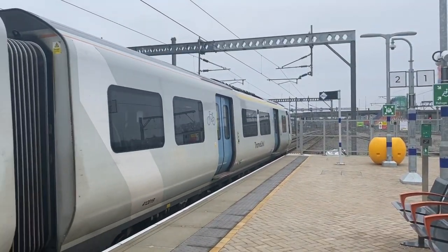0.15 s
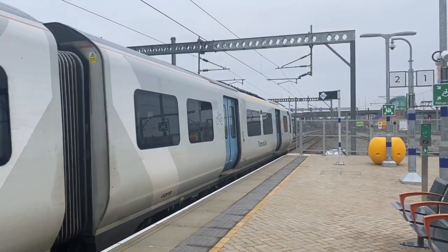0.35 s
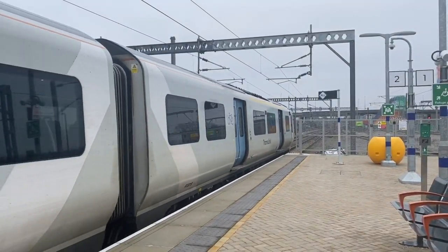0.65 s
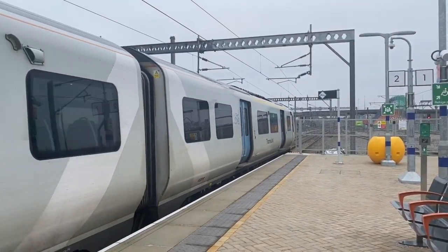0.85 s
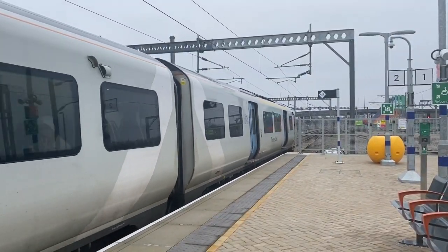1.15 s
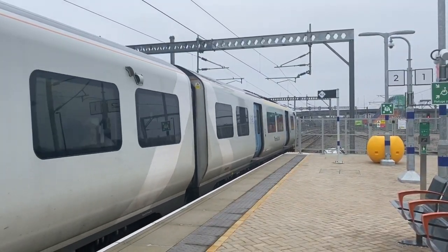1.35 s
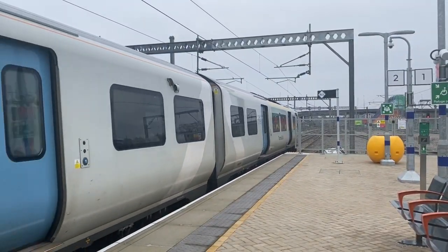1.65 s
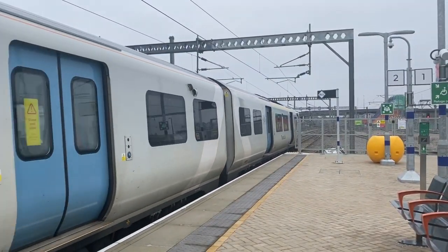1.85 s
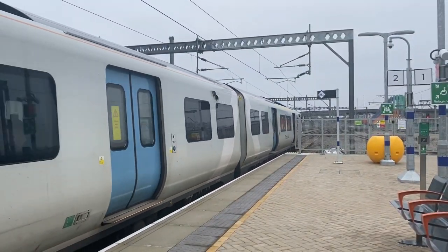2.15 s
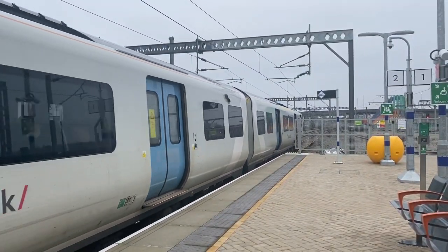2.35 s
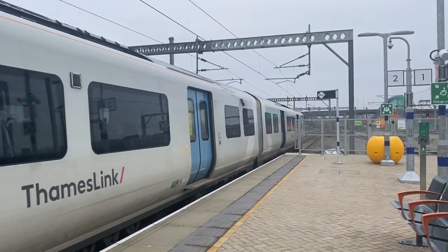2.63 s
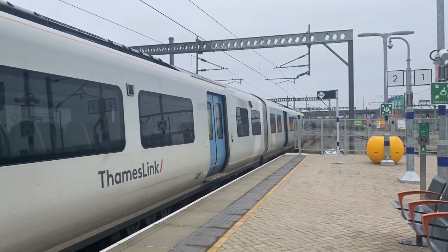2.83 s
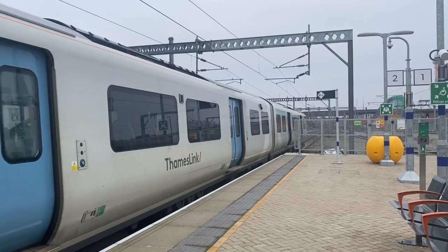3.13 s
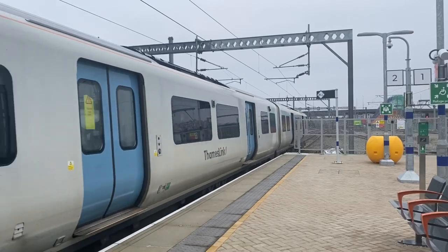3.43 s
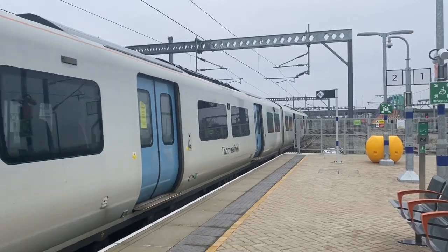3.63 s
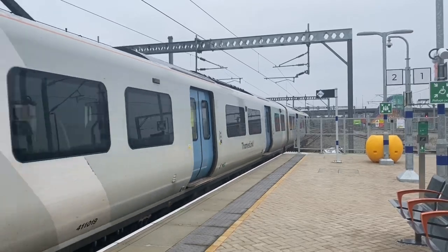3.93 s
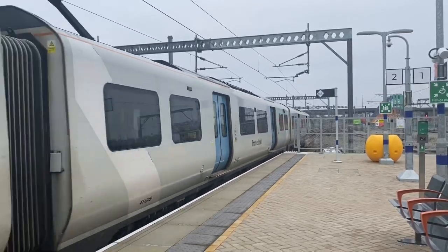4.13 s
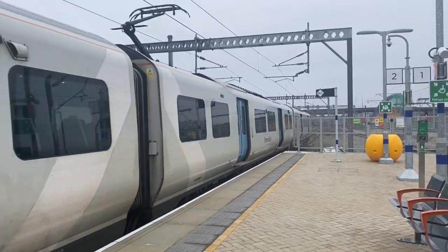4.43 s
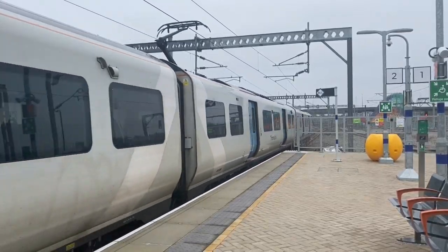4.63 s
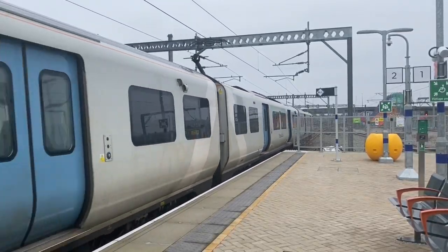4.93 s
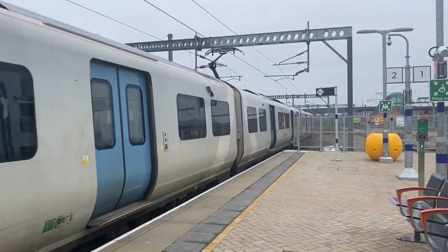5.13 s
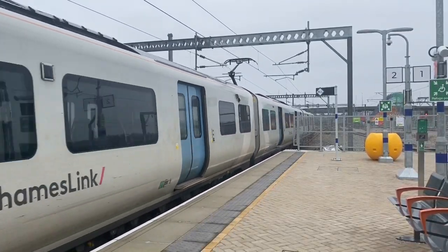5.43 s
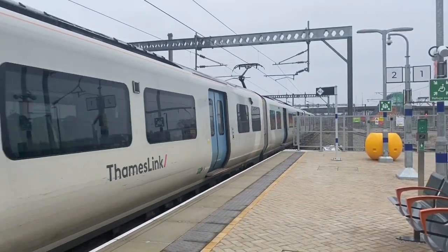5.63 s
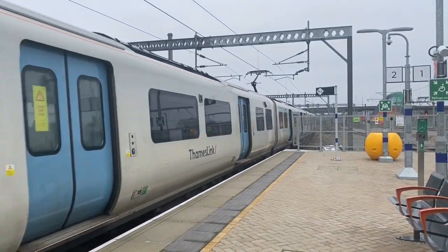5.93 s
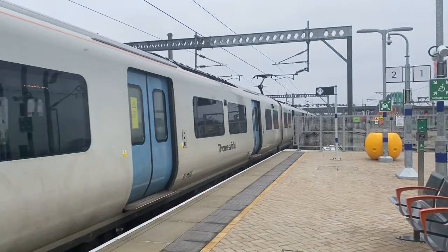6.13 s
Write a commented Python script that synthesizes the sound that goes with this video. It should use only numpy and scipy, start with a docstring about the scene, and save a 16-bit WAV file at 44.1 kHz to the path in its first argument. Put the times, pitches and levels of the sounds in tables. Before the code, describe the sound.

Close electric train pulling away: rising motor hum, ringing inverter whine, fizzing converter buzz, and wheels rumbling and hissing louder as carriages pass.

```python
"""Electric train pulling away

An electric train gathers speed along an open platform, within a few metres of a pair of microphones.
Traction inverters sing on multiples of their switching rate and sag in pitch as they pass; an auxiliary
converter fizzes by between them. Motors and gears whine upward over the rumble and hiss of the wheels.
Tones are lines of wandering strength and phase, the rest is coloured noise; nearness shapes most levels."""
import sys
import numpy as np
from scipy import signal
from scipy.fft import rfft, irfft, next_fast_len
from scipy.io import wavfile
from scipy.ndimage import uniform_filter1d

SR = 44100
rng = np.random.default_rng(int(sys.argv[2]) if len(sys.argv) > 2 else 0)


def output_pcm(signal):
    """Save a mono or channel-first signal as 16-bit PCM at the path in sys.argv[1].

    Samples are clipped to [-1, 1] before scaling.
    """
    pcm = np.clip(np.atleast_2d(signal).T, -1, 1) * 32767
    wavfile.write(sys.argv[1], SR, np.round(pcm).astype(np.int16))


N = 276947
TIME = np.arange(N) / SR
SIZE = next_fast_len(N)
BINS = np.fft.rfftfreq(SIZE, 1 / SR)

# motor speed as the pitch of its hum: t/s, fundamental f/Hz
MOTOR_SPEED = [(0, 50), (1.8, 75.8), (3, 97.2), (4, 114.6), (5, 132), (5.6, 143), (6.28, 153.5)]
# traction inverters riding past: abreast t/s, distance/m, level/dB, extra level of buzz and sizzle/dB
INVERTER_UNITS = [(-.05, 2.6, 2, -3), (4.24, 2, 1.5, .5), (5.8, 3, -24, 21)]
# level of the inverters' clean tone: t/s, level/dB
TONE_LEVEL = [(0, -47), (.23, -53.5), (.42, -45), (.52, -54.5), (.62, -48), (1.2, -55.5), (1.5, -49.5),
              (1.75, -54), (2.25, -49), (2.45, -48), (2.95, -48.5), (3.3, -47.5), (3.55, -53.5),
              (3.78, -43), (3.95, -52), (4.22, -47), (4.37, -42), (4.54, -44), (4.63, -38.5), (4.77, -51),
              (4.9, -45), (5, -34.5), (5.14, -57), (5.32, -38.5), (5.46, -37), (5.55, -50), (5.63, -38),
              (5.69, -51), (5.8, -41.5), (5.95, -46), (6.28, -48)]
# bogies riding past: abreast t/s, distance/m, level/dB
BOGIE_PASSES = [(.1, 4.3, -3), (3.45, 0.6, -28.5), (4.4, 3.86, -1), (6.15, 2.9, -1.5)]

SWITCH_HZ = 676  # switching rate of the traction inverters
METRES_PER_CYCLE = .054  # train travel per cycle of the hum
REFERENCE_HZ = 100  # hum pitch at which growth with speed is 0 dB
MOTOR_TURNS = np.cumsum(np.interp(TIME, *np.transpose(MOTOR_SPEED))) / SR  # cycles of the hum so far


def gain_of(db):
    """Decibels to amplitude."""
    return np.exp(np.asarray(db) * (np.log(10) / 20))


def evened(x):
    """Scales to rms 1."""
    return x / np.sqrt(np.mean(abs(x) ** 2) + 1e-20)


def curves(rows):
    """Each column of a time table, sample by sample."""
    s, *columns = np.transpose(rows)
    return [np.interp(TIME, s, column) for column in columns]


def spectra(rows):
    """Each column of a frequency table, bin by bin along a log frequency axis."""
    hz, *columns = np.transpose(rows)
    return [np.interp(np.log(BINS + 1), np.log(hz), column) for column in columns]


def noise(spectrum):
    """Steady noise of the given colour, rms 1."""
    white = rfft(rng.standard_normal(SIZE))
    return evened(irfft(white * gain_of(spectra(spectrum)[0]), SIZE)[:N])


def line(turns, width_hz, steady=0.):
    """A tone whose strength and phase wander, which spreads it over a band; steady is its unwavering part."""
    count = next_fast_len(N // 16)  # the wander is slow, so a coarse grid will do
    hz = np.fft.fftfreq(count, N / SR / count)
    bell = 2 ** -np.minimum(2 * (hz / width_hz) ** 2, 20)  # half power across the full width
    draws = rng.standard_normal(count) + 1j * rng.standard_normal(count)
    wander = evened(np.fft.ifft(bell * draws))
    wander = evened(wander + steady * np.exp(2j * np.pi * rng.random()))
    wander = np.interp(TIME, np.linspace(0, TIME[-1], count), np.sqrt(2) * wander).astype(np.complex64)
    angle = 2 * np.pi * (turns - np.floor(turns)).astype(np.float32)
    return wander.real * np.cos(angle) - wander.imag * np.sin(angle)


def wobble(rate_hz):
    """Slow random motion up to about the given rate, rms 1."""
    count = N // 100
    hz = np.fft.rfftfreq(count, N / SR / count)
    slow = irfft(rfft(rng.standard_normal(count)) * np.exp(-(hz / rate_hz) ** 2), count)
    return np.interp(TIME, np.linspace(0, TIME[-1], count), evened(slow))


def octaves():
    """Motor speed in octaves above the reference."""
    return np.log2(curves(MOTOR_SPEED)[0] / REFERENCE_HZ)


def pass_by(abreast_s, distance):
    """Emission time (which gives the Doppler glide) and nearness of a point riding on the train."""
    travel = METRES_PER_CYCLE * MOTOR_TURNS
    # a quadratic through the travel also places points that are abreast before the start
    journey = np.polyfit(TIME[::SR // 10], travel[::SR // 10], 2)
    path = np.hypot(travel - np.polyval(journey, abreast_s), distance)
    delay = path / 343  # speed of sound in m/s
    return TIME - delay, distance / path


def passing(points, beam=1.):
    """Joint gain of points (abreast t/s, distance/m, level/dB) riding past; a higher beam is more directional."""
    return np.sqrt(sum((gain_of(db) * pass_by(s, distance)[1] ** beam) ** 2 for s, distance, db in points))


def units():
    """For each inverter, its share of their joint sound and the switching cycles heard from it so far."""
    rides = [pass_by(s, distance) for s, distance, _, _ in INVERTER_UNITS]
    weights = [gain_of(row[2]) * near for row, (_, near) in zip(INVERTER_UNITS, rides)]
    total = np.sqrt(sum(weight ** 2 for weight in weights))
    return [(weight / total, SWITCH_HZ * emitted) for weight, (emitted, _) in zip(weights, rides)]


def body_lift(multiple):
    """Decibels that car body and gear case add, over time, to this multiple of the motor speed."""
    # resonances: centre f/Hz, width/Hz, lift/dB
    resonances = [(98, 15, 3.5), (134.8, 5.8, 8.5), (150.6, 2.1, 16), (179, 42.4, 9.5), (220.7, 7.9, 8),
                  (250.4, 19.6, 8.5), (265.5, 10, 5.5), (296.8, 9.6, 8), (352, 9, 8), (439.5, 26, 11),
                  (522, 15, 4), (602, 24, 5.5), (760, 51, 2), (836, 67, 4.5), (910, 230, 5.5),
                  (1050, 34, 2), (1220, 16, 5)]
    s = TIME[::SR // 200]
    hz = multiple * np.interp(s, *np.transpose(MOTOR_SPEED))
    lift = sum(db / (1 + (2 * (hz - centre) / width) ** 2) for centre, width, db in resonances)
    return np.interp(TIME, s, lift)


def fans():
    """Cooling air rushes steadily under the cars, whatever the speed."""
    # colour of the air rush: f/Hz, relative level per Hz/dB
    air_colour = [(600, 8), (1000, -36), (1350, 27.5), (1700, -18), (3000, -5.5)]
    return gain_of(-57.5) * noise(air_colour)


def tone_echo():
    """The inverters' clean tone thrown back from along the platform, its pitches smeared together."""
    level_db = uniform_filter1d(curves(TONE_LEVEL)[0], size=SR // 2)  # half a second of smoothing
    return gain_of(level_db - 6.5) * line(2 * SWITCH_HZ * TIME, width_hz=56)


def rolling():
    """Wheel and rail roughness shakes track and car body, rings the rails and hisses.

    The deep bass and the boom follow their own levels; the others grow with speed and as bogies pass."""
    # levels of deep bass and body boom, each before its trim: t/s, level/dB
    deep_level = [(0, -34.5), (0.8, -40), (1.8, -41.5), (2.1, -34.5), (3.3, -33.5), (4.3, -38),
                  (6.28, -30.5)]
    boom_level = [(0, -34), (0.3, -32.5), (1.3, -38), (1.9, -32.5), (2.6, -35.5), (3.15, -32.5),
                  (3.45, -27.5), (3.7, -38.5), (3.95, -27.5), (4.3, -36.5), (4.65, -30.5), (5, -27.5),
                  (5.3, -18), (5.9, -29.5), (6.28, -24.5)]
    # noise colours: f/Hz, relative level per Hz/dB
    deep_colour = [(15, -42), (30, -21), (50, -2.0), (70, 4.5), (120, 0.5), (300, -70.0)]
    rumble_colour = [(15, -42), (30, -7), (48, -0.5), (70, 2), (110, -3), (165, 6), (220, -11), (500, -85)]
    boom_colour = [(100, -55), (170, -9.5), (205, 1), (240, 2.5), (262, 4), (285, 1), (310, -2.5),
                   (360, -26), (700, -73)]
    roar_colour = [(150, -25), (330, 2), (430, 3.5), (560, -0.5), (850, -3.5), (1200, -10.5), (1600, -13),
                   (2500, -17), (6000, -60)]
    ring_colour = [(1000, -48), (1600, -6.5), (1820, 2), (1980, 9), (2140, 10.5), (2350, -2), (2560, 12.5),
                   (2850, 9.5), (3150, 0), (3600, -6.5), (4500, -88)]
    hiss_colour = [(2000, -41), (3300, 16), (3650, 8), (4200, 9), (4800, 4.5), (5500, 10.5), (6400, 2.5),
                   (7600, -1), (8500, -16.5), (9400, -2), (10800, -3.5), (12000, -36), (13500, -14),
                   (15000, -18)]
    speed, bogies = octaves(), passing(BOGIE_PASSES, beam=1.29)

    def level(far_db, near_db, db_per_octave):
        """The whole train plus the bogie alongside, both growing with speed."""
        return gain_of(db_per_octave * speed) * np.hypot(gain_of(far_db), gain_of(near_db) * bogies)

    deep = gain_of(curves(deep_level)[0] - 2.5) * noise(deep_colour)
    boom = gain_of(curves(boom_level)[0] - 3.5) * noise(boom_colour)
    rumble = level(far_db=-39.5, near_db=-39, db_per_octave=5.5) * noise(rumble_colour)
    roar = level(far_db=-42.0, near_db=-41.5, db_per_octave=5.5) * noise(roar_colour)
    ring = level(far_db=-48.0, near_db=-40.0, db_per_octave=11.0) * noise(ring_colour)
    hiss = level(far_db=-57.0, near_db=-44.0, db_per_octave=7.5) * noise(hiss_colour)
    return deep + boom + rumble + roar + ring + hiss


def squeals():
    """A wheel rubs the rail and sings in short swells near one resonance."""
    # swells: peak t/s, f/Hz, half length/s, level/dB
    swells = [(4.302, 2125, 0.04, -35.5), (5.815, 2126, 0.15, -40), (6.02, 2185, 0.11, -41)]
    out = 0
    for s, hz, half, db in swells:
        swell = np.exp(-((TIME - s) / half) ** 2)
        out = out + gain_of(db) * swell * line(hz * TIME, width_hz=93, steady=0.28)
    return out


def drive():
    """Hum and gear whine swell as each multiple climbs through a resonance, and as bogies and gearbox pass."""
    # motor hum and gear whine: multiple of the hum fundamental, level/dB
    hum_orders = [(1, -43.5), (2, -46.5), (3, -48), (3.5, -57), (4, -51.5), (5, -54)]
    gear_orders = [(6, -10), (7, -8.5), (8, -5), (9, -11), (10, -15), (11, -15)]
    # a second, lower drone that also climbs with speed: multiple of its own fundamental, level/dB
    drone_orders = [(1, -48), (2, -48.5), (3, -50)]
    # gearbox riding past: abreast t/s, distance/m, level/dB
    gearbox = (4.42, 4.3, -46)
    drone_ratio = .8  # drone fundamental over hum fundamental
    hum_db_per_octave, gear_db_per_octave = 7, -0.5  # change with speed
    speed = octaves()

    orders = list(hum_orders) + [(k * drone_ratio, db) for k, db in drone_orders]
    hum = sum(gain_of(db + body_lift(k)) * line(k * MOTOR_TURNS, width_hz=15, steady=1.5) for k, db in orders)

    meshing = MOTOR_TURNS + 0.014 * wobble(rate_hz=7.0)  # backlash: gears run a little ahead and behind
    gears = 0
    for k, db in gear_orders:
        flutter_db = 2 * wobble(rate_hz=6)
        gears = gears + gain_of(db + body_lift(k) + flutter_db) * line(k * meshing, width_hz=30, steady=.3)

    # the motors ride on the bogies
    motors = gain_of(hum_db_per_octave * speed) * passing(BOGIE_PASSES, beam=0.67) * hum
    return motors + gain_of(gear_db_per_octave * speed) * passing([gearbox], beam=0.61) * gears


def converter():
    """Combs of sidebands round a 3 kHz carrier and its multiples, beamed from two vents under the floor."""
    # path that sets the Doppler glide: abreast t/s, distance/m
    ride = (2.2, 3.2)
    # vents riding past: abreast t/s, distance/m, level/dB
    vents = [(1.88, 1.23, -46), (2.62, 2.22, -45.5)]
    # lower and upper comb: f/Hz, level relative to the vents/dB
    low_comb = [(2890, -11.5), (2990, -3.5), (3090, -6), (3190, -3.5), (3290, -10), (3390, -14)]
    high_comb = [(5690, -19), (5790, -9.5), (5890, -18), (5990, -9.5), (6090, -8.5), (6190, -10.5),
                 (6290, -18), (6480, -16), (8900, -21.5), (9050, -23)]
    emitted, _ = pass_by(*ride)
    out = 0
    for comb, beam in ((low_comb, 0.93), (high_comb, 1.28)):  # the upper comb is more directional
        lines = sum(gain_of(db) * line(hz * emitted, width_hz=hz / 60, steady=2000 / hz) for hz, db in comb)
        out = out + passing(vents, beam) * lines
    return out


def inverter_tone():
    """Twice the switching rate rings clean from every unit.

    It is high from one that nears and low from one that has passed, so they beat."""
    # how the units share the tone: t/s, level of the first/dB, of the second/dB, of the third/dB
    shares = [(0, 0, -4, -30), (1.5, -2, 0, -30), (2.2, 0, -8, -30), (3.1, 0, -3, -30), (3.6, -9, 0, -25),
              (4.5, -24, 0, -14), (5, -24, 0, -8), (5.4, -24, 0, -18)]
    weights = [gain_of(db) for db in curves(shares)]
    total = np.sqrt(sum(weight ** 2 for weight in weights))
    tones = 0
    for weight, (_, turns) in zip(weights, units()):
        tones = tones + weight * line(2 * turns, width_hz=18, steady=1.9)
    return gain_of(curves(TONE_LEVEL)[0]) * tones / total


def inverters():
    """Each unit whines on four times the switching rate; smeared other multiples swell as a unit rides past."""
    # level of the whine with its sidebands: t/s, level/dB
    whine_level = [(0, -36.5), (.2, -36.5), (.71, -36.5), (.77, -44.5), (.87, -37.5), (.97, -43),
                   (1.1, -39), (1.8, -42), (2.6, -40.5), (3.3, -44.5), (3.85, -41.5), (3.96, -36.5),
                   (4.3, -37), (4.85, -39.5), (5.1, -43), (5.5, -61), (6, -59), (6.28, -51)]
    # the buzz's smeared bands: multiple of the switching rate, width/Hz, level/dB, growth/dB per octave
    buzz_bands = [(3, 150, -39, -7), (5, 81, -4, -2.5), (6, 92, 2.5, 3), (7, 66, -5.5, 3.5),
                  (10, 100, -8, 2), (12, 200, -11.5, -0.5)]
    # the sizzle's smeared bands: multiple of the switching rate, width/Hz, level/dB
    sizzle_bands = [(8, 96, 0.5), (9, 96, -18), (14, 300, -9), (16, 240, -14.5), (20, 260, -23)]
    sideband_db, sideband_db_per_octave = -8, 7  # sidebands of the whine grow with motor speed
    swing_turns, swing_db_per_octave = 0.059, 21  # phase swing in cycles at the reference speed
    buzz_db, sizzle_db = -50.5, -51.5  # shared by all bands of each kind
    buzz_lag_s, sizzle_lead_s = .35, .08
    speed, whine, drift = octaves(), 0, 0

    beside = gain_of(sideband_db + sideband_db_per_octave * speed)
    for share, turns in units():
        # the motor current puts a sideband on each side of the whine; they spread apart as speed rises
        sidebands = sum(line(4 * turns + side * MOTOR_TURNS, width_hz=38) for side in (-1, 1))
        whine = whine + share * (line(4 * turns, width_hz=36, steady=.95) + beside * sidebands)
        drift = drift + share ** 2 * np.gradient(turns)
    whine = whine / np.sqrt(1 + 2 * beside ** 2)

    turns = np.cumsum(drift)  # the strongest unit dominates the pitch of the smeared bands
    # the motor current swings their phase, more with speed
    swing = swing_turns * gain_of(swing_db_per_octave * speed) * np.sin(2 * np.pi * MOTOR_TURNS)
    buzz = 0
    for k, width, db, growth in buzz_bands:
        buzz = buzz + gain_of(db + growth * speed) * line(k * turns + swing, width_hz=width)
    sizzle = sum(gain_of(db) * line(k * turns + swing, width_hz=width) for k, width, db in sizzle_bands)

    smeared = [(s, distance, db + extra_db) for s, distance, db, extra_db in INVERTER_UNITS]
    behind = [(s + buzz_lag_s, distance, db) for s, distance, db in smeared]  # the buzz is beamed backwards
    ahead = [(s - sizzle_lead_s, distance, db) for s, distance, db in smeared]  # the sizzle forwards
    return (gain_of(curves(whine_level)[0]) * whine
            + gain_of(buzz_db) * passing(behind, beam=1.17) * buzz
            + gain_of(sizzle_db) * passing(ahead, beam=1.11) * sizzle)


def underfloor():
    """Converter, fans, motors and wheels together, with the echo of the inverter tone."""
    return fans() + tone_echo() + rolling() + squeals() + drive() + converter()


def microphones(source, unscattered=0):
    """Sound reaches the left microphone first; what platform and car side scatter differs between the two."""
    # the pair: f/Hz, coherence, phase by which left leads/rad, left minus right level/dB
    pair = [(60, 1, 0.41, 0), (306, 0.92, 0.046, 1), (584, 0.91, 0.84, -2.5), (1140, 0.83, 1.76, 0),
            (1398, 0.81, 1.7, -5.5), (1540, 0.089, 4.55, -2.5), (2420, 0.56, 7.2, -1),
            (2970, 0.93, 8.06, 0.5), (3010, 1, 7.64, 5), (5350, 0.14, 6.5, -1.5), (6070, 0.62, 7.1, -2),
            (9350, 0.58, 1.24, -2.5), (13600, 0.71, 1.4, 0)]
    # two independent draws of the source: one common to both sides, one of opposite sign in each
    direct, scattered = rfft(source() + unscattered, SIZE), rfft(source(), SIZE)
    same, lead, balance_db = spectra(pair)
    same = np.clip(same, 0, .995)
    common = np.sqrt((1 + same) / 2) * direct
    apart = np.sqrt((1 - same) / 2) * scattered
    left = (common + apart) * gain_of(balance_db / 2)
    right = (common - apart) * gain_of(-balance_db / 2) * np.exp(-1j * lead)
    # make up for what cancels when left and right are averaged
    centre = np.sqrt(np.maximum((1 + same * np.cos(lead)) / 2, .25))
    return irfft(np.array([left, right]) / centre, SIZE)[:, :N]


def scene():
    """The inverters' song, leaning from side to side, over the running gear."""
    # stereo lean of whine, buzz and sizzle: t/s, left minus right level/dB
    lean = [(0, 7), (.8, 5), (1.8, 2.5), (3.8, -2.5), (5, 7)]
    lean_db = curves(lean)[0]
    song = microphones(inverters) * gain_of([lean_db / 2, -lean_db / 2])
    return song + microphones(underfloor, unscattered=inverter_tone())


def record(dry):
    """The recorder's band limit: a steep low-pass."""
    low_pass = signal.firwin(511, 15150, window=("kaiser", 9), fs=SR)  # edge in Hz
    return signal.oaconvolve(dry, low_pass[None], "same")


dry = scene()
out = record(dry)
output_pcm(out)
```